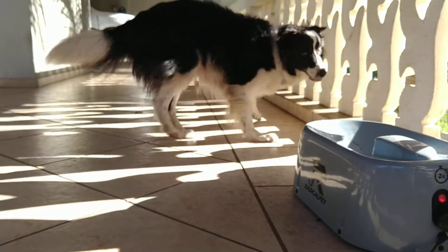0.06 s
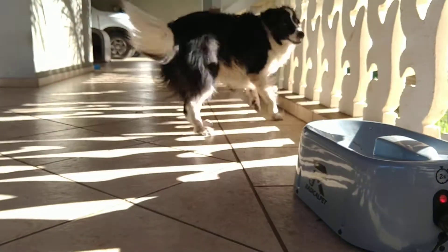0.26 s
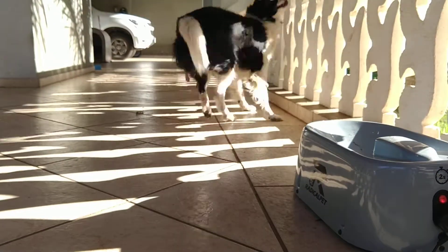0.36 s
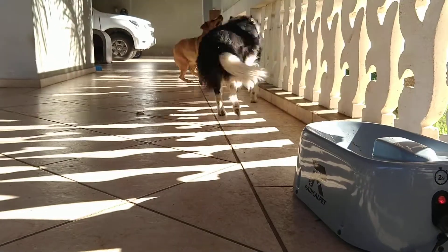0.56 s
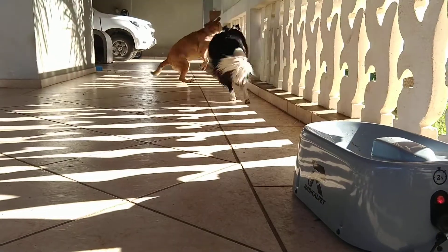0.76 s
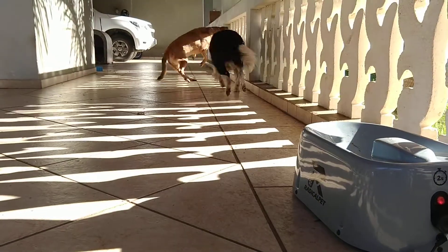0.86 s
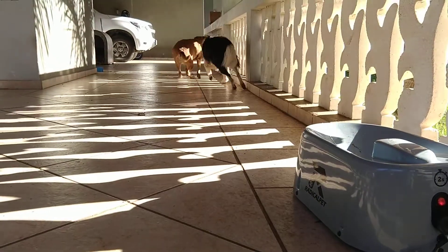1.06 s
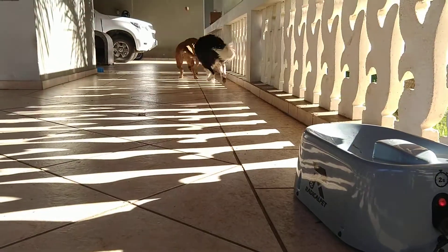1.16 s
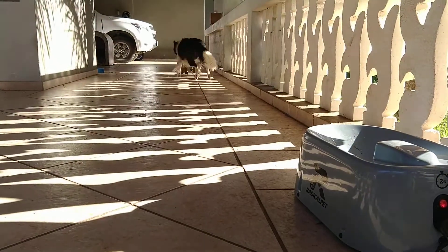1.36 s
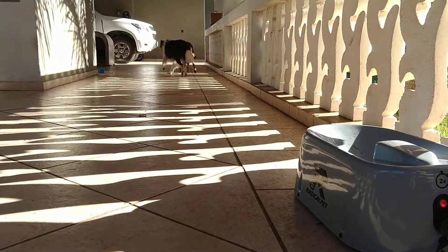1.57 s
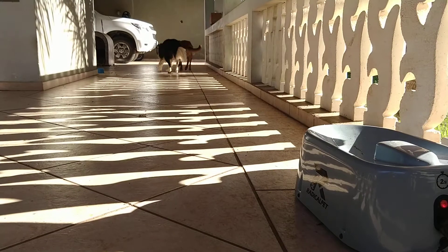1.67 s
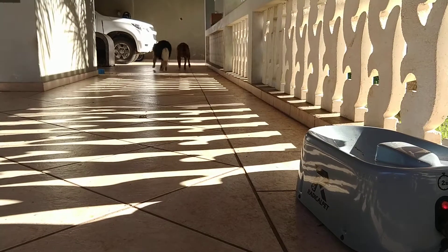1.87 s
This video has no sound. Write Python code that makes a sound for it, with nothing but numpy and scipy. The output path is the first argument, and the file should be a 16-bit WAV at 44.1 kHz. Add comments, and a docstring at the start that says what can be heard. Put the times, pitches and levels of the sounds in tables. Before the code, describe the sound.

A ball launcher pops sharply, then dogs race off, claws ticking on tiles.

```python
"""A low rumble with small knocks comes first: a ball launcher winds up on a tiled, roofed veranda.
Its plunger slides and strikes with a sharp pop, pushing air from the barrel and ringing the plastic.
Two dogs race away, paws thudding and scuffing, claws ticking on the tiles. The hollow ball lands
and bounces further off. Behind it all are a quiet outdoor hush and a faint, wavering tone."""
import sys
import numpy as np
from scipy import signal
from scipy.fft import rfft, irfft, next_fast_len
from scipy.io import wavfile

SR = 44100
rng = np.random.default_rng(int(sys.argv[2]) if len(sys.argv) > 2 else 0)


def store_pcm(level_fs):
    """Save levels as 16-bit WAV."""
    pcm = np.round(np.clip(level_fs, -1, 1) * 32767).astype(np.int16)
    wavfile.write(sys.argv[1], SR, np.atleast_2d(pcm).T)


N = 83790
T = np.arange(N) / SR
HIT_T = T[:SR // 2]  # half a second for one short sound


def amp(db):
    """Turn decibels into a number to multiply by."""
    return 10 ** (np.asarray(db) / 20)


def along(points, hz):
    """Read between the rows of a frequency table, on a log scale."""
    f, v = np.transpose(points)
    return np.interp(np.log(hz + 1), np.log(f + 1), v)


def level(points):
    """A loudness curve through (time, dB) points, silent outside them."""
    return amp(np.interp(T, *np.transpose(points), left=-np.inf, right=-np.inf))


def filtered(x, response):
    """Scale and shift each frequency of x by response(hz)."""
    size = next_fast_len(N + SR // 2)
    hz = np.fft.rfftfreq(size, 1 / SR)
    return irfft(rfft(x, size) * response(hz), size)[..., :N]


def noise(colour):
    """Steady noise of strength 1; its colour says how strong each frequency is."""
    x = filtered(rng.standard_normal(N), lambda hz: amp(along(colour, hz)))
    return x / x.std()


def burst(envelope, colour, size=4096):
    """A short coloured noise with the energy of 10 ms of steady noise."""
    gains = amp(along(colour, np.fft.rfftfreq(size, 1 / SR)))
    cepstrum = irfft(np.log(gains))
    cepstrum[1:size // 2] *= 2  # folded so that nothing sounds before the hit
    cepstrum[size // 2 + 1:] = 0
    impulse = irfft(np.exp(rfft(cepstrum)))
    x = signal.fftconvolve(envelope * rng.standard_normal(len(envelope)), impulse)
    return x * np.sqrt(SR / 100 / np.sum(x ** 2))


def decay(fade_s, rise_s=1e-4):
    """The shape of a hit: a quick rise, then a 60 dB fade."""
    return np.exp(-np.log(1000) * HIT_T / fade_s) * (1 - np.exp(-HIT_T / rise_s))


def ring(hz, db, fade_s, rise_s):
    """One fading note of a struck object."""
    return amp(db) * decay(fade_s, rise_s) * np.sin(2 * np.pi * hz * HIT_T)


def swell(hz, db, peak_s):
    """A few waves that build to a peak and die away."""
    envelope = (HIT_T / peak_s * np.exp(1 - HIT_T / peak_s)) ** 2
    return amp(db) * envelope * np.sin(2 * np.pi * hz * HIT_T)


def add(out, start, x):
    """Mix x into out from a start time in seconds."""
    i = max(round(start * SR), 0)
    out[..., i:i + x.shape[-1]] += x[..., :N - i]


# how long the echo takes to fade by 60 dB: f/Hz, fade/s
ECHO_FADE = [(100, 0.44), (600, 0.47), (2000, 0.44), (8000, .36), (15000, 0.21)]
def veranda(x, echo_db, build_s=0.0042, spread_db=-8):
    """The sound plus its echo from floor, roof and walls, nearly alike left and right."""
    hz, t, spectrum = signal.stft(rng.standard_normal((2, SR // 2)), SR, nperseg=256)
    fade = np.exp(-np.log(1000) * t / along(ECHO_FADE, hz)[:, None])
    build = 1 - np.exp(-(t / build_s) ** 2)
    mid, side = signal.istft(spectrum * fade * build, SR, nperseg=256)[1]
    echo = mid + amp(spread_db) * np.array([side, -side])
    echo *= amp(echo_db) / np.linalg.norm(echo[0])
    echo[:, 0] += 1  # the direct sound
    return signal.fftconvolve(x[None], echo, axes=1)[:, :N]


# colour of the outdoor hush: f/Hz, level/dB
AIR_COLOUR = [(25, 6), (70, 4), (170, -0.5), (350, -3.5), (650, -21), (1000, -8), (2000, -46), (4000, -48),
              (8000, -91), (15000, -48)]
def outdoor_air():
    """A quiet, steady, low hush."""
    return veranda(amp(-56) * noise(AIR_COLOUR), echo_db=-2.5)


# loudness of the faint tone: t/s, level/dB
TONE_LEVEL = [(0.701, -63), (.95, -60), (1.098, -50.5), (1.3, -59), (1.602, -68), (1.8, -63)]
def faint_tone(hz=619, waver_rad=0.4):
    """One soft note whose pitch wavers a little."""
    waver = waver_rad * np.interp(T, np.linspace(0, T[-1], 50), rng.standard_normal(50))
    return level(TONE_LEVEL) * np.sin(2 * np.pi * hz * T + waver)


# the ball's landings: t/s, level/dB
BOUNCES = [(1.425, -36), (1.742, -54.5)]
# colour of its slap: f/Hz, level/dB
SLAP_COLOUR = [(40, -10), (170, 15.5), (330, 5.5), (650, -3), (1000, 8), (1600, -4), (2500, -12),
               (4000, -15), (8000, -15), (15000, -28.5)]
# notes it rings with: f/Hz, level/dB, fade/s
BALL_NOTES = [(183.5, 3, .13), (920, -7, 0.11), (987, -16, 0.086)]
def ball():
    """The hollow ball slaps the tiles and rings briefly."""
    out = np.zeros((2, N))
    ringing = sum(ring(*note, rise_s=0.0015) for note in BALL_NOTES)
    for start, db in BOUNCES:
        slap = burst(decay(fade_s=0.031), SLAP_COLOUR)
        add(out, start, amp(db) * veranda(slap, echo_db=1))
        add(out, start, amp(db) * veranda(ringing, echo_db=-19))
    return out


# claws touching down: t/s, level/dB
CLAW_TICKS = [(0.0359, -48.5), (0.044, -60), (.102, -80), (.127, -57), (0.173, -60), (0.546, -71),
              (.552, -54.5), (0.5964, -47), (.608, -54), (0.644, -58), (.655, -49), (0.8431, -48),
              (.929, -78), (1.015, -55.5), (1.07, -58.5), (1.0916, -40.5), (1.1775, -51), (1.181, -47.5),
              (1.2734, -44), (1.2786, -45), (1.36, -70), (1.525, -59.5), (1.554, -55), (1.564, -49.5),
              (1.692, -62), (1.730, -56.5), (1.869, -68), (1.896, -60)]
# colour of a tick: f/Hz, level/dB
TICK_COLOUR = [(200, -7), (1000, -14), (2100, -7.5), (3300, -3), (5000, -9), (8000, 4), (10000, -6),
               (13000, -7), (15500, -32)]
def claws():
    """The dogs' claws tick sharply on the tiles."""
    out = np.zeros((2, N))
    for start, db in CLAW_TICKS:
        tick = amp(db) * burst(decay(fade_s=0.0064), TICK_COLOUR)
        add(out, start, veranda(tick, echo_db=-3))
    return out


# the dogs' steps: t/s, thud level/dB, scuff level/dB, scuff length/s
STEPS = [(0.387, -43, -42, 0.034), (0.428, -35.5, -50.5, 0.013), (0.517, -42.5, -60, 0.013),
         (0.539, -41, -53, 0.022), (0.593, -38.5, -53, 0.041), (0.642, -42, -49.5, 0.012),
         (0.693, -41, -52.5, 0.016), (0.838, -40.5, -58, 0.017), (.912, -43.5, -53.5, 0.024),
         (.96, -52, -83, .02), (1.011, -42, -52, .03), (1.056, -46.5, -47, 0.045), (1.087, -39, -50, 0.025),
         (1.141, -54.5, -52, 0.073), (1.174, -41, -43.5, 0.018), (1.21, -42.5, -60, 0.018),
         (1.269, -39, -51.5, 0.018), (1.331, -45, -75, 0.017), (1.519, -43.5, -57.5, 0.011),
         (1.556, -41.5, -46.5, 0.019), (1.601, -44.5, -56, 0.018), (1.692, -50.5, -60, .02),
         (1.725, -44, -58, 0.0067), (1.861, -46.5, -60, 0.019), (1.885, -44.5, -57, 0.026)]
# colour of a paw pad's thud: f/Hz, level/dB
THUD_COLOUR = [(30, -16), (70, 6), (125, 0.5), (250, -1.5), (380, -8), (650, -7.5), (1050, -15),
               (1500, -22), (2200, -26), (5000, -40)]
# colour of a scuff: f/Hz, level/dB
SCUFF_COLOUR = [(200, -5), (1000, 2.5), (2200, -4), (3400, -2.5), (5000, -2), (6500, -3.5), (8000, 1),
                (9600, -6.5), (11300, -5), (12300, -1.5), (13200, -14), (15500, -16)]
def paws(grit_db=1.5):
    """Each paw thuds down and scuffs over grit, which makes the scuff uneven."""
    out = np.zeros((2, N))
    grain_times = HIT_T[::40]
    for start, thud_db, scuff_db, length in STEPS:
        thud = amp(thud_db) * burst(decay(fade_s=0.15, rise_s=0.00083), THUD_COLOUR)
        grit = amp(grit_db * np.interp(HIT_T, grain_times, rng.standard_normal(len(grain_times))))
        stroke = (HIT_T / length) ** 0.25 * np.exp(-(HIT_T / length) ** 2)
        scuff = amp(scuff_db) * burst(grit * stroke, SCUFF_COLOUR)
        add(out, start, veranda(thud + scuff, echo_db=-2))
    return out


# loudness of the launcher's rumble: t/s, level/dB
RUMBLE_LEVEL = [(0, -35.5), (.03, -35.5), (.09, -37), (.2, -39), (.3, -30), (.44, -50.5), (.5, -65),
                (.58, -78)]
# knocks of its mechanism: t/s, level/dB
MECHANISM_KNOCKS = [(0.016, -41.5), (0.075, -34.5), (.091, -37.5), (0.132, -34), (.174, -30.5), (.386, -29),
                    (.443, -36)]
# colour of both: f/Hz, level/dB
MECHANISM_COLOUR = [(30, -49), (70, -0.5), (130, -0.5), (320, 1.5), (480, -3), (750, -11), (1200, -17),
                    (2000, -28), (4000, -40.5), (8000, -35), (15000, -47)]
def wind_up():
    """The mechanism rumbles and knocks inside the housing, stopping soon after the shot."""
    rumble = level(RUMBLE_LEVEL) * noise(MECHANISM_COLOUR)
    for start, db in MECHANISM_KNOCKS:
        add(rumble, start, amp(db) * burst(decay(fade_s=0.039), MECHANISM_COLOUR))
    return veranda(rumble, echo_db=-4)


# loudness of the sliding plunger: t/s, level/dB
SLIDE_LEVEL = [(.203, -37), (.207, -27), (.215, -34.5), (.221, -20), (.227, -24.5), (.233, -23),
               (.243, -27), (.251, -26.5), (.262, -46), (.28, -54)]
# colour of the slide: f/Hz, level/dB
SLIDE_COLOUR = [(30, -32), (120, 9), (600, 14), (1150, 8), (1700, 5.5), (2900, -6.5), (4500, 1),
                (5300, -1.5), (6500, -1.5), (8500, 4), (9700, -8), (11300, -7), (12300, -14), (15500, -14)]
def plunger_slide():
    """The plunger slides with a short rasp."""
    return veranda(level(SLIDE_LEVEL) * noise(SLIDE_COLOUR), echo_db=-6.5)


def air_puff(start=0.2186):
    """The leaving ball pushes air out of the barrel with a low thump."""
    puff = np.zeros(N)
    add(puff, start, swell(hz=181.5, db=-9, peak_s=0.0057))
    return veranda(puff, echo_db=-10.5)


# the shot and its rebound: t/s, knock level/dB, crack level/dB, ring level/dB
PLUNGER_HITS = [(.2199, -8.5, -17.5, -29.5), (0.2473, -14.5, -24, -21)]
# notes of the barrel's hollow knock: f/Hz, level/dB, time to peak/s
BARREL_NOTES = [(565, 2.5, 0.0027), (690, -11, 0.0019)]
# colour of the crack: f/Hz, level/dB
CRACK_COLOUR = [(30, -50), (120, -12.5), (300, 7.5), (600, 1.5), (950, 2), (1280, -5.5), (1550, -13),
                (2100, -10.5), (2800, -9.5), (3400, -25), (5400, -21.5), (8000, -27), (15000, -31)]
# notes of the plastic housing: f/Hz, level/dB, fade/s
HOUSING_NOTES = [(212.7, -5, 0.27), (335, -8, 0.2), (415.7, -11, 0.58), (498.5, 7, 0.19), (576, 8, 0.27),
                 (645, -13, 0.16), (872, -3.5, 0.33), (972, -7, 0.47), (1016, -12, 0.24),
                 (1139, -5.5, 0.23), (1234, -18, 0.65), (2105, -27, 0.082)]
def plunger_pop(knock_early_s=0.0012):
    """The plunger strikes and rebounds: each hit knocks the barrel, cracks and rings the housing."""
    knocks, cracks, housing = np.zeros((3, N))
    knock = sum(swell(*note) for note in BARREL_NOTES)
    ringing = sum(ring(*note, rise_s=0.0011) for note in HOUSING_NOTES)
    for start, knock_db, crack_db, ring_db in PLUNGER_HITS:
        add(knocks, start - knock_early_s, amp(knock_db) * knock)
        add(cracks, start, amp(crack_db) * burst(decay(fade_s=0.025), CRACK_COLOUR))
        add(housing, start, amp(ring_db) * ringing)
    return veranda(knocks, echo_db=-4.5) + veranda(cracks, echo_db=2) + housing


def scene():
    """Background, ball, dogs and launcher together."""
    background = outdoor_air() + faint_tone()
    dogs = claws() + amp(1) * paws()
    launcher = amp(-1.5) * wind_up() + plunger_slide() + air_puff() + plunger_pop()
    return background + ball() + dogs + launcher


# how much louder the left side is: f/Hz, level/dB
LEFT_LOUDER = [(25, 19), (70, 32), (110, 6.5), (200, 6), (380, 0.5), (700, 2.5), (2400, 0), (4400, 3),
               (8100, 10.5), (13000, -3)]
# shift of the left wave against the right, negative is later: f/Hz, phase/rad
LEFT_PHASE = [(0, 0), (100, -1.4), (400, -1.1), (1200, -.2), (2350, -3.14), (16750, -40.8)]
def record(dry, low_cut_hz=87.4, top_hz=15700):
    """Stereo widening: the sides differ in level and phase, the left lagging; bass and top are cut."""
    def widen_stereo(hz):
        phase = np.interp(hz, *np.transpose(LEFT_PHASE))
        left = amp(along(LEFT_LOUDER, hz) / 2) * np.exp(0.5j * phase)
        return np.array([left, 1 / left]) / np.sqrt((abs(left) ** 2 + abs(left) ** -2) / 2)
    def low_cut(hz):
        return hz ** 2 / np.hypot(hz ** 2, low_cut_hz ** 2)
    x = filtered(dry, lambda hz: widen_stereo(hz) * low_cut(hz))
    rounded = x / (1 + x ** 6) ** (1 / 6)  # softens the loudest peaks
    return filtered(rounded, lambda hz: hz < top_hz)


dry = scene()
out = record(dry)
store_pcm(out)
```